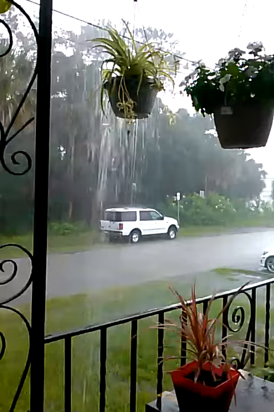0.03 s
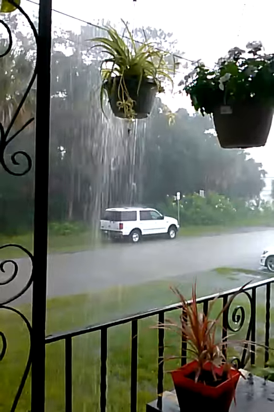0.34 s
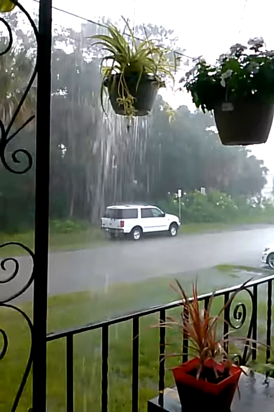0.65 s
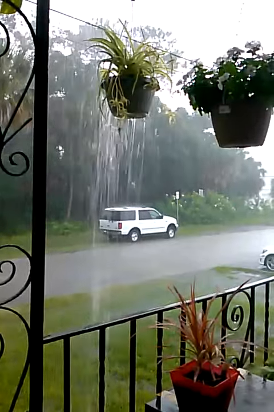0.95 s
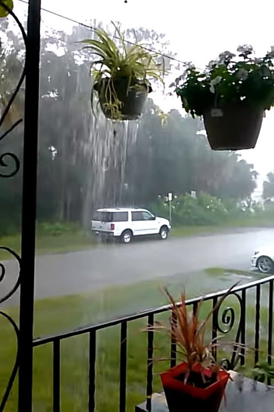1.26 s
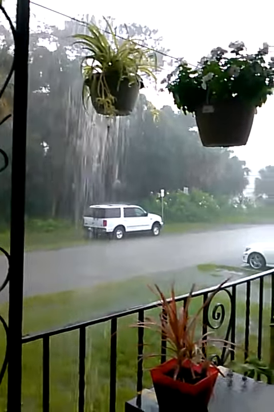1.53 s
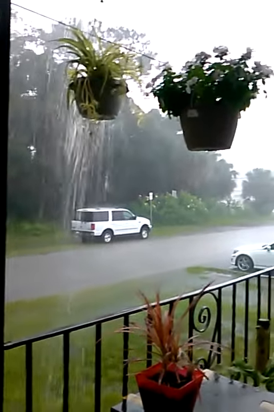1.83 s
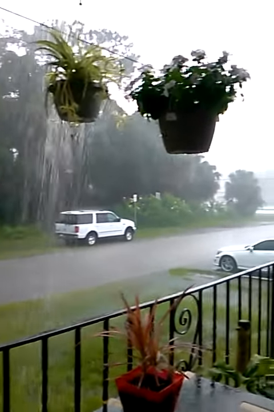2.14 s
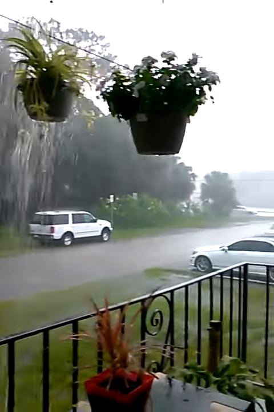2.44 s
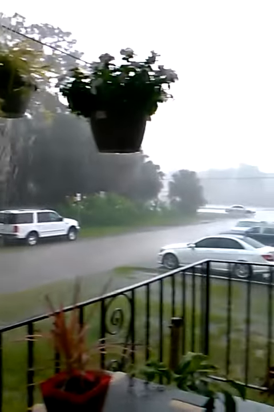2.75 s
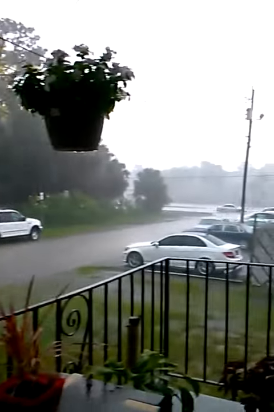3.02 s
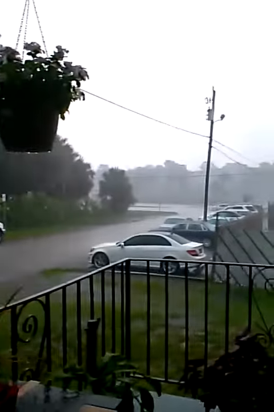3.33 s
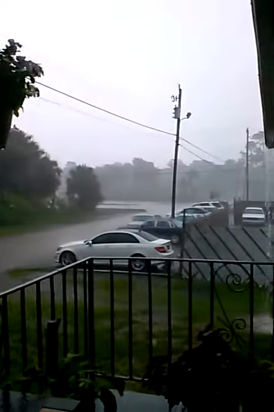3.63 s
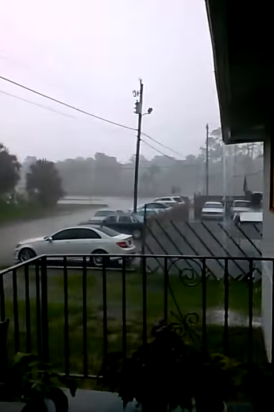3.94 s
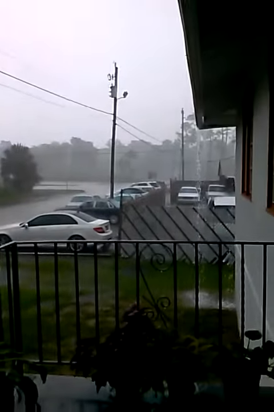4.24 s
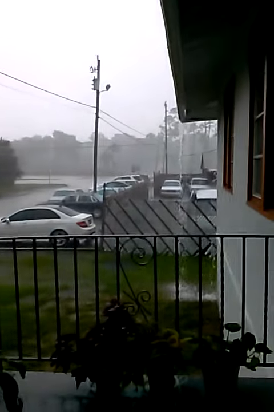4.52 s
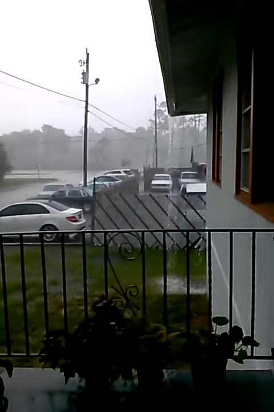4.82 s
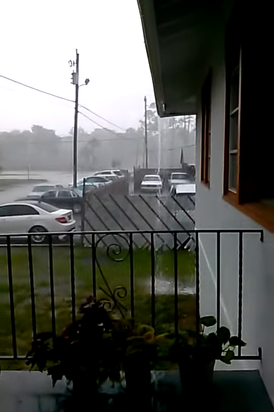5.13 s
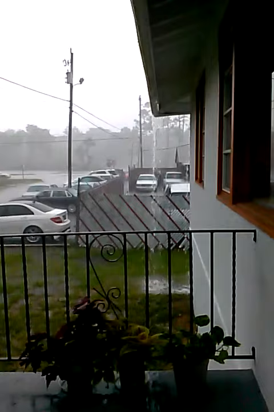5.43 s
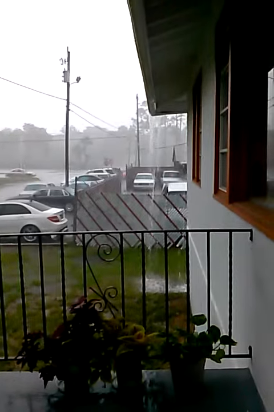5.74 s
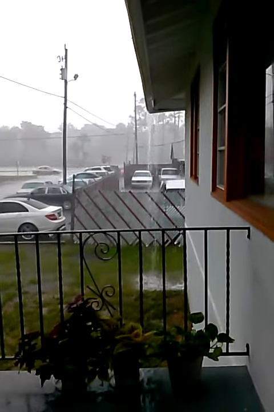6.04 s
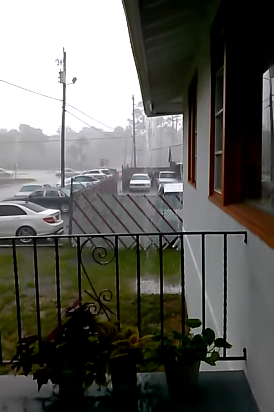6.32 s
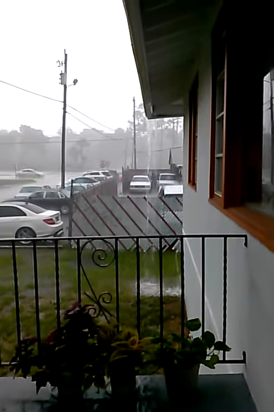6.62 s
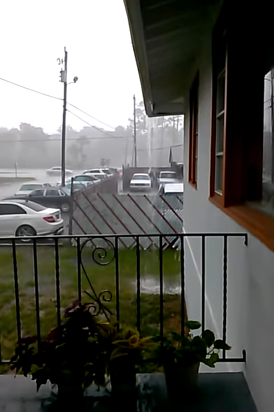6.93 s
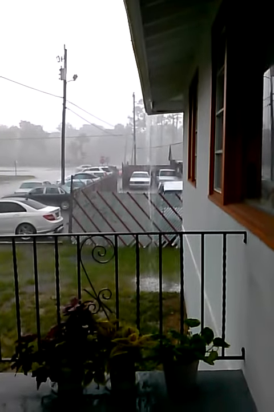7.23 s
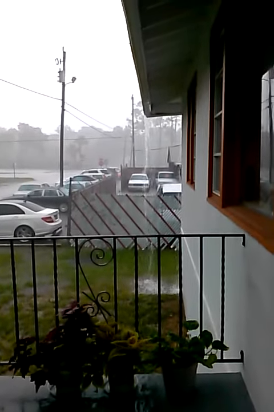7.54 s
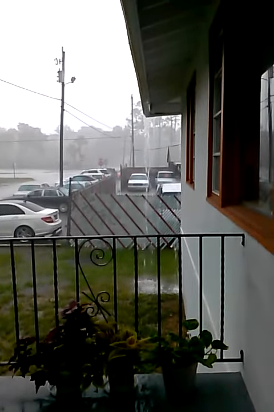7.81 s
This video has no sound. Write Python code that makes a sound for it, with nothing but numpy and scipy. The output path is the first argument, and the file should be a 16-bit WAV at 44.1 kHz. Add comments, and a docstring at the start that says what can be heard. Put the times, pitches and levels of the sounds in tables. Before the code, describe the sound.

After a brief silence, heavy rain cuts in at about 0.8 seconds and continues until the end, near 8 seconds. Heard from a covered porch, it is a dense, gently swelling roar with a bright fizz on grass and leaves and soft, low drumming overhead. Water off the roof splatters and gurgles throughout, slightly hollow in tone, and puddles burble. Fat drips smack and small drops tick close by, standing out around 3.2 and 4.3 seconds and clustering between 6.4 and 7.3. Light wind rumbles on the microphone in short gusts. A distant car engine hums faintly around 2 seconds, returns at 4, peaks between 5 and 6, then fades. From about 5 seconds the high fizz softens a little and the puddle bubbling becomes clearer, with small spurts of spray after 6.5 seconds.

```python
"""A covered porch in heavy rain, heard on one microphone that turns slowly towards the house wall.
Countless drops roar on the yard, fizz on grass and leaves and drum on the roof. Water running off
the roof splatters down, coloured by the hollow porch and the wall. Bubbles ring in the puddles,
fat drips smack down and small drops tick nearby.
Wind nudges the microphone and a car hums along the far road."""
import sys
import numpy as np
from scipy import signal
from scipy.fft import rfft, irfft
from scipy.io import wavfile
from scipy.ndimage import uniform_filter1d

SR = 44100
rng = np.random.default_rng(int(sys.argv[2]) if len(sys.argv) > 2 else 0)


def persist_wave(psi):
    """Save psi, clipped to +-1, as 16-bit WAV."""
    counts = np.round(np.clip(psi, -1, 1) * 32767).astype(np.int16)
    wavfile.write(sys.argv[1], SR, np.atleast_2d(counts).T)


N = 347067
START_S, TOP_HZ = 0.769, 15750
SHEETS_PER_S = 8.2  # the rain comes down in uneven sheets

# How the downpour on the yard slowly swells: t/s, level/dB
YARD_LEVEL = [(0.8, -30), (2.0, -29.5), (3.5, -28), (4.5, -30), (5.1, -28.5), (5.75, -27), (6.5, -28),
              (7.4, -26.5), (7.85, -28)]
# The tone of its roar, from low to high: f/Hz, relative level/dB
YARD_TONE = [(100, -32), (250, -9.5), (400, 0), (600, -0.5), (800, 1), (1000, -1.5), (1200, -2), (1500, -2),
             (2200, -3.5), (2850, -6.5), (3300, -12), (4500, -12), (7000, -16), (16000, -58)]

def yard_roar():
    """So many drops hit the ground that they blur into a dull roar."""
    level_db, = follow(YARD_LEVEL)
    drops = patchy(patter(per_s=550, spread_db=9, burst_s=0.0075, near=0.18), depth_db=3.0)
    return gain_of(level_db + 0.64 * swell(SHEETS_PER_S)) * tint(drops, YARD_TONE)


# The tone of rain on grass and leaves, and of the finest spray: f/Hz, relative level/dB
FIZZ_TONE = [(1000, -14), (3500, -26.5), (5200, -11), (6400, -6), (7600, -1.5), (8800, 0), (10200, -1.5),
             (12000, -6), (14000, -19), (16000, -22)]
MIST_TONE = [(6000, -45), (10000, 0.5), (12500, 1.5), (14000, -0.5), (16000, -7)]
# The wall blocks some fizz once the microphone has turned: t/s, level change/dB
WALL_SHADE = [(0.8, -0.6), (3.0, 0.3), (4.82, 0.5), (5.08, -5), (5.9, -5.5), (6.4, -3.5), (7.85, -4)]
# Gushes off the roof's edge burst into spray: middle t/s, length/s, boost to the fizz/dB
GUSHES = [(6.52, 0.039, 3), (6.68, 0.044, 2), (7.01, 0.16, 2.5), (7.32, .08, 2), (7.51, 0.068, 2.5),
          (7.82, .06, 1)]

def grass_fizz():
    """Drops burst on grass and leaves in a bright fizz, with a fine mist above it."""
    wall_db, = follow(WALL_SHADE)
    gush_db = surges(GUSHES)
    sheets_db = 0.34 * swell(SHEETS_PER_S)
    fizz_db = -24.5 + wall_db + gush_db + sheets_db
    mist_db = -34 + 0.4 * wall_db + 1.8 * gush_db + sheets_db  # mist is blocked less and leaps more
    fizz = patter(per_s=1100, spread_db=4.0, burst_s=0.0035, near=0.51)
    fizz = patchy(fizz, depth_db=0.9, size=(14, 8))
    mist = patter(per_s=600, spread_db=4.5, burst_s=0.0011, near=0.48)
    return gain_of(fizz_db) * tint(fizz, FIZZ_TONE) + gain_of(mist_db) * tint(mist, MIST_TONE)


# Six pitches, low to high, that the hollow porch and echoes off the wall bring out.
# They shift as the microphone turns: t/s, f/Hz, level before trim/dB
THRUM = [(0.8, 620, -40), (1.5, 620, -37), (1.7, 390, -40.5), (2.1, 390, -41), (2.8, 400, -39),
         (3.2, 535, -42), (3.6, 600, -39.5), (4.4, 565, -45), (5.0, 700, -43), (5.8, 710, -34),
         (6.3, 700, -42), (6.7, 405, -39), (7.1, 330, -42), (7.85, 328, -40)]
GLUG = [(0.8, 954, -32.5), (1.7, 970, -35), (2.4, 930, -42), (3.4, 926, -32), (4.1, 997, -34),
        (5.4, 977, -36.5), (6.0, 1040, -34), (7.85, 1010, -40)]
SLOSH = [(0.8, 2040, -36), (1.8, 2020, -39), (2.3, 1330, -40), (3.6, 1280, -37.5), (4.8, 1290, -38.5),
         (5.7, 1415, -38), (7.85, 1390, -38.5)]
GURGLE = [(0.8, 1630, -34), (1.85, 1620, -34), (2.0, 1700, -47), (2.1, 2130, -38), (2.6, 2170, -38),
          (3.0, 2100, -43), (3.2, 1920, -36.5), (4.0, 1950, -34.5), (4.8, 1930, -34.5), (5.4, 1910, -37),
          (6.05, 1900, -34), (6.5, 1880, -40), (7.85, 1880, -39)]
SPLATTER = [(0.8, 2780, -40), (1.3, 2930, -35), (2.0, 2750, -45), (2.9, 2600, -46), (4.0, 2770, -36.5),
            (5.0, 2800, -44), (5.7, 2560, -39), (6.2, 2480, -50), (6.5, 2650, -33), (6.8, 2500, -51),
            (7.0, 2485, -36), (7.3, 2670, -39), (7.85, 2560, -47)]
SPRAY = [(0.8, 4400, -36), (1.2, 4270, -44), (1.9, 4400, -40.5), (2.1, 3750, -48), (2.8, 3670, -42),
         (3.2, 3900, -61), (4.4, 4450, -44), (5.2, 4930, -40), (6.0, 5100, -46), (7.3, 5570, -42),
         (7.85, 5730, -46)]

def runoff():
    """Water splatters off the roof, coloured by porch and wall resonances."""
    coarse = patter(per_s=200, spread_db=2.5, burst_s=0.007, near=0.97)
    medium = patter(per_s=260, spread_db=2.8, burst_s=0.003, near=0.6)
    fine = patter(per_s=350, spread_db=5.5, burst_s=0.0017, near=0.73)
    splashing = patter(per_s=150, spread_db=2.5, burst_s=0.003, near=0.91)
    splashing = patchy(splashing, depth_db=2.5, size=(6, 20))
    return (porch_resonance(coarse, THRUM, width_hz=143, trim_db=-0.2)
            + porch_resonance(coarse, GLUG, width_hz=163, trim_db=-1.0)
            + porch_resonance(coarse, SLOSH, width_hz=280, trim_db=0.1)
            + porch_resonance(medium, GURGLE, width_hz=225, trim_db=-0.2)
            + porch_resonance(splashing, SPLATTER, width_hz=550, trim_db=0.7)
            + porch_resonance(fine, SPRAY, width_hz=1100, trim_db=1.3))


def porch_resonance(splatter, curve, width_hz, trim_db):
    """Porch and wall bring out one band of the splatter, which shifts as the microphone turns."""
    hz, db = follow(curve)
    return gain_of(db + trim_db) * resonate(splatter, hz, width_hz)


# Fat drips landing nearby: t/s, ring level/dB, ring f/Hz, slap level/dB
FAT_DRIPS = [(1.4842, -17, 2050, -37), (1.866, -15, 2170, -22), (2.4644, -19.5, 2080, -38),
             (3.157, -15.5, 1890, -21), (3.2638, -10.5, 2200, -37), (4.052, -16, 1260, -36),
             (4.2846, -9.5, 2030, -14), (4.5322, -13, 2800, -25), (5.1308, -15, 2590, -27),
             (5.8038, -17, 2800, -33), (6.4125, -9, 2480, -26), (6.448, -17, 2650, -30),
             (6.4897, -14.5, 1930, -22), (6.6822, -13.5, 2700, -30), (6.9272, -11.5, 2560, -28),
             (6.975, -17, 2010, -24), (7.3017, -14, 3150, -23), (7.842, -16, 2600, -24)]

def drips():
    """Each drip makes a slap, a short ring, then a scatter of droplets falling back."""
    t, out = np.arange(SR // 6) / SR, np.zeros(N)
    slap_band = signal.butter(2, [700, 5200], "band", fs=SR, output="sos")
    for s, ring_db, hz, slap_db in FAT_DRIPS:
        slap, scatter = rng.standard_normal((2, len(t)))
        slap = evened(signal.sosfilt(slap_band, slap))
        scatter = resonate(scatter, np.full(len(t), hz), width_hz=800)
        body = ring(t, hz, cycles=2.1) + gain_of(-18) * scatter * np.exp(-t / 0.062)
        splash = slap * (np.exp(-t / 0.0021) + gain_of(-17) * np.exp(-t / 0.077))
        add(out, s, gain_of(ring_db) * body + gain_of(slap_db) * splash)
    return out


# Small drops on leaves and railing: t/s, ring level/dB, f/Hz
SMALL_DROPS = [(.818, -21, 3940), (2.364, -14, 7850), (2.473, -15, 11900), (3.1, -16.5, 5240),
               (3.895, -16, 8200), (4.286, -14.5, 4100), (4.571, -21, 4240), (5.158, -22, 4870),
               (5.484, -15, 5600), (5.885, -20, 5240), (5.936, -19, 5040), (6.413, -18, 4400),
               (6.682, -16, 5900), (7.022, -19, 5700), (7.609, -18.5, 5800)]

def ticks():
    """Small drops ring high and very briefly, with a trace of spatter."""
    t, out = np.arange(SR // 8) / SR, np.zeros(N)
    for s, db, hz in SMALL_DROPS:
        spatter = resonate(rng.standard_normal(len(t)), np.full(len(t), hz), width_hz=1400)
        spatter *= gain_of(-9.5) * np.exp(-t / 0.02)
        add(out, s, gain_of(db) * (ring(t, hz, cycles=2.1) + spatter))
    return out


# The puddle below the roof's edge, louder as the microphone turns to it: t/s, level/dB
PUDDLE_LEVEL = [(0.8, -46), (2.6, -48), (3.8, -45), (5.0, -41), (5.7, -37.5), (7.85, -38)]

def puddles():
    """The flooded lawn burbles; the stream off the roof churns up smaller, brighter bubbles."""
    db, = follow(PUDDLE_LEVEL)
    away_db = db - db.max()  # the finest plinks fade fastest when the microphone faces away
    lawn = bubbles(per_s=130, spread_db=2, cycles=3.4, low_hz=598.7, high_hz=2410)
    churn = bubbles(per_s=40, spread_db=2, cycles=9.6, low_hz=2240, high_hz=2914)
    fine = bubbles(per_s=32, spread_db=0, cycles=11, low_hz=4840, high_hz=6100)
    return gain_of(-37) * lawn + gain_of(db) * churn + gain_of(db + away_db - 5) * fine


def bubbles(per_s, spread_db, cycles, low_hz, high_hz, pitches=40):
    """Bubbles of many sizes plink in the standing water."""
    t, out = np.arange(SR // 20) / SR, np.zeros(N)
    strength = impacts(per_s, spread_db)
    plinks = [ring(t, hz, cycles) for hz in np.geomspace(low_hz, high_hz, pitches)]
    for at in np.flatnonzero(strength):
        add(out, at / SR, strength[at] * plinks[rng.integers(pitches)])
    return evened(out)


# How loud the rain is overhead: t/s, level/dB
ROOF_LEVEL = [(0.8, -36), (1.8, -34), (3.3, -41), (4.3, -38), (5.2, -36.5), (6.2, -32), (6.9, -40.5),
              (7.4, -36), (7.85, -40)]
# The roof's deep tone: f/Hz, relative level/dB
ROOF_TONE = [(50, -14), (110, -6), (160, 0), (220, -3.5), (310, -6.5), (500, -17), (1500, -36)]

def roof_drumming():
    """Drops beat on the porch roof like a soft, low drum."""
    level_db, = follow(ROOF_LEVEL)
    drops = patchy(patter(per_s=200, spread_db=3, burst_s=0.012, near=0.4), depth_db=3.0, size=(2, 24))
    return gain_of(level_db + 0.96 * swell(SHEETS_PER_S)) * tint(drops, ROOF_TONE)


# The rumble of air on the microphone: f/Hz, relative level/dB
WIND_TONE = [(5, -7), (18, -1), (30, 1.5), (52, 0.5), (75, -6.5), (110, -10.5), (200, -35), (600, -65)]
# Stronger gusts: middle t/s, length/s, level above the breeze/dB
GUSTS = [(1.12, 0.37, 9.5), (1.57, 0.14, 4.5), (2.18, 0.11, 8), (2.61, 0.14, 9.5), (3.28, 0.068, 7),
         (3.85, 0.24, 4.5), (4.2, 0.076, 4), (5.0, 0.27, 6), (5.63, 0.083, 9), (6.05, .4, 3.5),
         (7.4, .4, 6.5)]

def wind():
    """A light, lumpy breeze pushes on the microphone, with a few gusts on top."""
    breeze_db = -33 + 2.5 * swell(per_s=9.9)
    return gain_of(breeze_db + surges(GUSTS)) * tint(rng.standard_normal(N), WIND_TONE)


# The far car's engine note: t/s, f/Hz, level/dB
ENGINE_NOTE = [(1.8, 105.7, -45), (2.2, 107, -40.5), (3.0, 102, -51.5), (3.6, 87.6, -59),
               (4.0, 96.2, -41.5), (4.9, 95.9, -38.5), (5.25, 99, -34.5), (5.5, 104.4, -37.5),
               (5.9, 104.2, -33), (6.2, 104.2, -35.5), (6.5, 104.2, -42.5), (7.8, 105.8, -54)]

def car():
    """Only the hum of the engine's firing carries through the rain, wavering a little."""
    hz, db = follow(ENGINE_NOTE)
    slow_wobble = [(1, 0), (6, 0), (25, -40), (100, -100)]  # f/Hz, relative level/dB
    drift = tint(rng.standard_normal(N), slow_wobble)
    flutter = tint(rng.standard_normal(N), slow_wobble)
    cycles = np.cumsum(hz * (1 + 0.0062 * drift)) / SR
    return gain_of(db + 1.16 * flutter) * np.sqrt(2) * np.sin(2 * np.pi * cycles)


def porch(x, fade_s, echo_db):
    """Wall, floor and roof throw back thin echoes that fall by 60 dB in fade_s."""
    t = np.arange(SR // 3) / SR
    echoes = rng.standard_normal(len(t)) * (rng.random(len(t)) < 2000 / SR)
    echoes *= (t > 0.004) * gain_of(-60 * t / fade_s)
    return x + gain_of(echo_db) * signal.fftconvolve(x, echoes / np.linalg.norm(echoes))[:N]


def impacts(per_s, spread_db):
    """Hits at random moments: many small, a few large."""
    strength = gain_of(spread_db * np.minimum(rng.exponential(1, N), 4))
    return strength * (rng.random(N) < per_s / SR)


def patter(per_s, spread_db, burst_s, near):
    """Close drops (the share `near` of the power) each hiss briefly; far ones blur into an even wash."""
    power = signal.lfilter([1], [1, -np.exp(-1 / (burst_s * SR))], impacts(per_s, spread_db) ** 2)
    return np.sqrt(near * power / power.mean() + 1 - near) * rng.standard_normal(N)


def patchy(x, depth_db, size=(5, 16)):
    """Rain lands unevenly, so patches of sound swell and fade; size is (pitch steps, time steps)."""
    grid = signal.stft(x, nperseg=1024, noverlap=768)[2]
    patches = rng.standard_normal(grid.shape)
    for axis, span in enumerate(size):
        patches = uniform_filter1d(patches, span, axis)
    grid *= gain_of(depth_db * evened(patches))
    return evened(signal.istft(grid, nperseg=1024, noverlap=768)[1][:N])


def ring(t, hz, cycles):
    """A small pocket of air rings: it is loudest after `cycles` swings, then dies away."""
    age = t * hz / cycles
    return age * np.exp(1 - age) * np.sin(2 * np.pi * hz * t)


def resonate(x, hz, width_hz):
    """Keeps a narrow band of x around the pitch hz, which may move."""
    spin = np.exp(2j * np.pi * np.cumsum(hz) / SR)
    decay = np.exp(-np.pi * width_hz / SR)
    return evened((spin * signal.lfilter([1], [1, -2 * decay, decay ** 2], x / spin)).real)


def tint(x, tone):
    """Shapes the lows and highs of x by a tone table, at average level 1."""
    hz, db = np.transpose(tone)
    shape_db = np.interp(np.log(np.fft.rfftfreq(N, 1 / SR) + 1), np.log(hz), db)
    return evened(irfft(rfft(x) * gain_of(shape_db), N))


def swell(per_s):
    """A random rise and fall, up to about per_s times a second."""
    hz = np.fft.rfftfreq(N, 1 / SR)
    slow_band = hz / (hz + 2) / (1 + (hz / per_s) ** 4)
    return evened(irfft(rfft(rng.standard_normal(N)) * slow_band, N))


def surges(rows):
    """Each surge rises and falls in one smooth arch, in dB."""
    t = np.arange(N) / SR
    return sum(db * np.exp(-(2 * (t - s) / length) ** 2) for s, length, db in rows)


def follow(rows):
    """Joins a table's points in time with straight lines, one curve for each column after t."""
    s, *columns = np.transpose(rows)
    return [np.interp(np.arange(N) / SR, s, column) for column in columns]


def add(mix, s, sound):
    """Mixes a sound in at s seconds."""
    part = mix[round(s * SR):][:len(sound)]
    part += sound[:len(part)]


def gain_of(db):
    """Turns decibels into a number to multiply by."""
    return 10 ** (np.asarray(db) / 20)


def evened(x):
    """Scales x to an average (rms) level of 1."""
    return x / np.sqrt(np.mean(x ** 2) + 1e-20)


def scene():
    """Everything reaches one microphone, the same on both channels."""
    close_drops = porch(drips() + ticks(), fade_s=0.2, echo_db=-11)
    rain = yard_roar() + grass_fizz() + roof_drumming()
    mono = rain + runoff() + puddles() + close_drops + wind() + car()
    return np.array([mono, mono])


def record(dry):
    """The microphone switches on suddenly at START_S and loses the treble above TOP_HZ."""
    opened = dry * (np.arange(N) / SR >= START_S)
    treble_cut = signal.firwin(601, TOP_HZ, window=("kaiser", 9), fs=SR)
    return signal.oaconvolve(opened, treble_cut[None], "same")


dry = scene()
out = record(dry)
persist_wave(out)
```